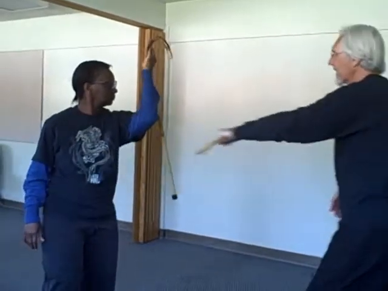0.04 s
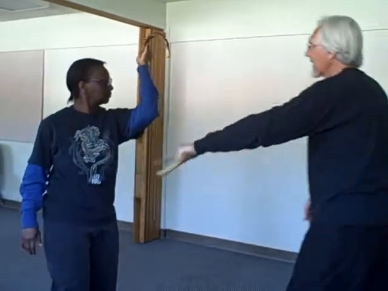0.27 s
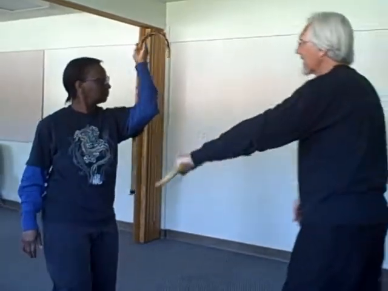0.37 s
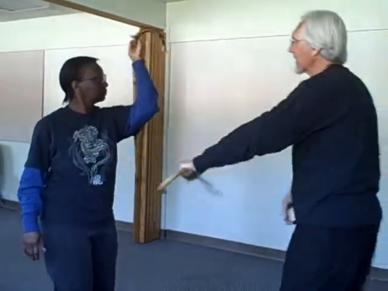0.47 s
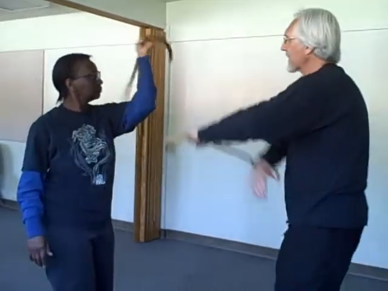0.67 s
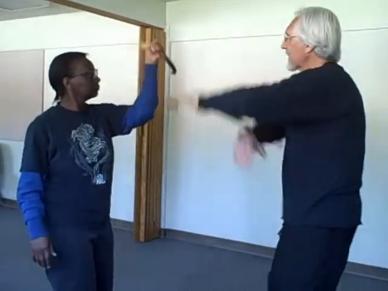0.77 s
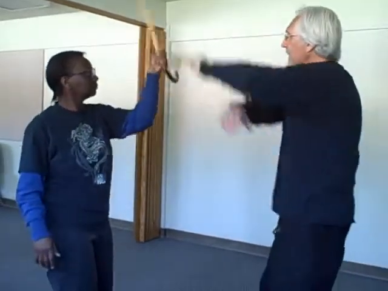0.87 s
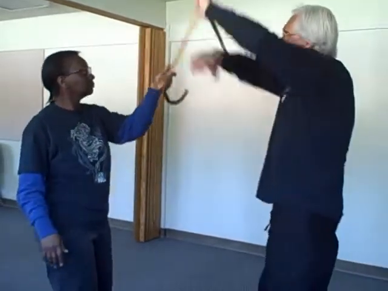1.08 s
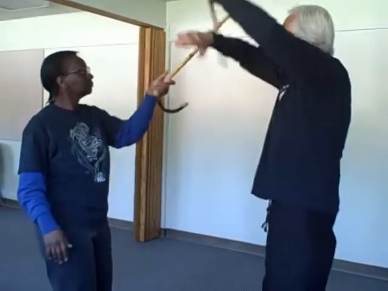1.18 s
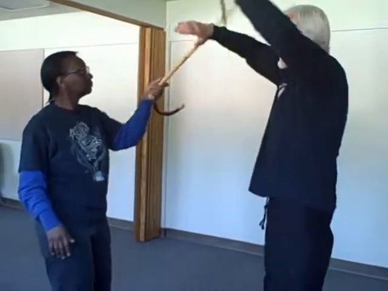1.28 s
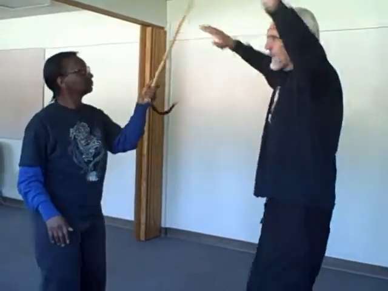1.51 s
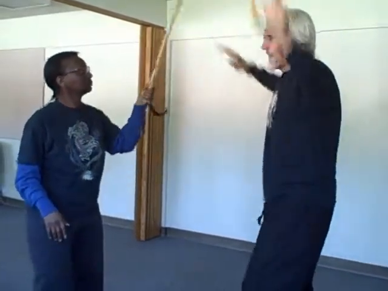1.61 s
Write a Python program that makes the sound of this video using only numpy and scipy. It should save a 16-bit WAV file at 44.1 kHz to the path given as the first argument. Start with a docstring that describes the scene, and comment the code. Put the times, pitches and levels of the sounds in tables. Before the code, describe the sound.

Wooden sticks knock sharply together, one hit and then a quick pair, echoing briefly indoors.

```python
"""Two wooden canes clack together three times in a partner drill, close by in a carpeted hall.
Each blow is a hard crack, and the canes bend and ring briefly at many pitches. Near walls throw
the crack back, and the hall rings on for about half a second. Underneath are the rumble and hum
of ventilation, a swish of sleeves and two soft steps that make the floor boom."""
import sys
import numpy as np
from scipy import signal
from scipy.fft import rfft, irfft
from scipy.io import wavfile
from scipy.ndimage import uniform_filter1d

SR = 44100
rng = np.random.default_rng(int(sys.argv[2]) if len(sys.argv) > 2 else 0)


def dump(signal):
    """Clip the signal to [-1, 1] and save it as 16-bit WAV at the path in sys.argv[1]."""
    limited = np.clip(np.atleast_2d(signal).T, -1, 1)
    pcm = np.round(limited * 32767).astype(np.int16)
    wavfile.write(sys.argv[1], SR, pcm)


N = 72765

# Table levels are relative. A "fade" is the time a sound takes to drop by 60 dB.
# tone colour of the faint hiss (f/Hz, level/dB)
HISS_COLOUR = [(150, 1), (200, -3.5), (316, -4.5), (400, -11), (480, -12), (600, -17.5), (1270, -22),
               (1740, -25), (5000, -33), (12800, -36.5), (16000, -46)]
# tone colour of the ventilation rumble (f/Hz, level/dB)
RUMBLE_COLOUR = [(12, 0), (30, 7), (55, 1), (90, -3), (130, -10.5), (180, -12), (260, -36.5), (500, -51)]
# how the rumble swells and sinks (t/s, level/dB)
RUMBLE_SWELL = [(0, -37), (.12, -41), (.33, -39), (.45, -41.5), (.6, -39), (.71, -35.5), (.78, -41),
                (.87, -37.5), (1.02, -43.5), (1.2, -38.5), (1.4, -39), (1.65, -42)]
# tone colour of rubbing cloth (f/Hz, level/dB)
CLOTH_COLOUR = [(150, -13.5), (400, 3), (1200, -4), (3000, -11.5), (8000, -17.5), (16000, -36.5)]
# sleeve swishes (middle t/s, half length/s, level/dB)
SLEEVE_SWISHES = [(0.65, 0.13, -58.5), (0.894, .08, -79.5)]
# footsteps (t/s, level/dB)
FOOTSTEPS = [(1.353, -27.5), (1.55, -35)]
# deep tones of the floor (f/Hz, fade/s, level/dB)
FLOOR_TONES = [(50, 0.25, -25), (94, 0.427, 1.5), (122.3, 0.336, 0), (158.7, 0.084, 11.5)]
# how the hall rings on at each pitch (f/Hz, fade/s, level/dB)
HALL_BANDS = [(205, 0.42, -3), (466, 0.3, 9), (986, 0.42, -3), (1590, 0.48, -1), (2360, 0.55, 1),
              (3840, 0.49, .5), (5910, 0.54, -4), (10500, .34, -3), (16000, 0.24, 3.5)]
# echoes from walls and ceiling, one list per blow as the canes change place (delay/s, level/dB)
WALL_ECHOES = [
    [(.0013, -1), (.0048, -3), (.0146, -8), (0.027, -12), (.041, -8.5)],
    [(.0013, -4), (.0058, -10), (.0138, 1), (.0418, -7), (.0532, -9.5)],
    [(.0022, -4), (.0055, -6.5), (.0102, -2), (.0135, -5), (.0185, -8)],
]
# tone colour of the crack (f/Hz, level/dB)
CRACK_COLOUR = [(100, -33), (280, -26.5), (450, -18), (800, -13), (1150, -9), (1550, -1.5), (2300, 0.5),
                (3200, -2), (4500, -3), (6000, -5.5), (8500, -9), (12500, -14), (16000, -17)]
# tone colour of the thin tick as the canes touch (f/Hz, level/dB)
TICK_COLOUR = [(1000, -22.5), (4000, -3.5), (7500, -3), (8700, -4.5), (10200, 3), (12000, -5.5),
               (16000, -11)]
# bending tones of the canes; the spot that is hit sets how hard each rings
# (f/Hz, fade/s, level/dB in blow 1, level/dB in blow 2, level/dB in blow 3)
CANE_TONES = [(403, 0.22, -41, -48.5, -51), (543, 0.153, -37, -42.5, -46.5), (741, 0.091, -31, -30.5, -31),
              (998, .105, -21.5, -23, -25.5), (1397, 0.049, -52.5, -19.5, -19.5), (1520, .1, -38, -23, -31),
              (1640, 0.11, -31.5, -27, -29), (1977, 0.036, -13, -21, -53), (2098, 0.076, -27.5, -18, -22),
              (2442, 0.053, -14.5, -27, -32), (2976, 0.037, -38, -17, -18), (3233, 0.046, -19, -25, -35),
              (3277, 0.064, -18.5, -38.5, -18.5), (3745, 0.052, -15, -52, -34),
              (4425, 0.049, -28, -25, -30), (4760, .07, -23.5, -44, -30.5), (5325, 0.13, -27.5, -53, -38),
              (5790, 0.03, -16.5, -56, -19), (6480, 0.035, -47, -22.5, -29), (7380, 0.045, -39, -45, -33)]
# the blows (t/s, crack level/dB, ring level/dB, treble corner f/Hz, tick level/dB, hall level/dB)
CANE_BLOWS = [(0.2202, 0, 1.5, 6270, -5, 1), (1.1832, -2, 0, 6240, -3, 3),
              (1.2896, -1.5, 1.5, 6400, -0.5, 2)]

HISS_DB, HUM_DB, HUM_HZ, HUM_WIDTH_HZ = -52, -51.5, 160.5, 32.4
STEP_RISE_S, ROOM_RISE_S = 0.033, 0.0097
CRACK_GAIN_DB, BODY_GAIN_DB, RING_GAIN_DB = 9, 4.5, 0.5
HALL_GAIN_DB, HALL_RING_GAIN_DB, SCATTER_GAIN_DB, SCATTER_TICK_GAIN_DB = 2, -18, 2, -7
BODY_FADE_S, TICK_FADE_S, SCATTER_FADE_S = 0.027, 0.018, 0.054
ECHO_TOP_HZ, TOP_HZ = 9000, 15800


def undb(db):
    """Turn decibels into a factor to multiply by."""
    return 10 ** (np.asarray(db) / 20)


def unit_energy(x):
    """Scale a sound so that its total energy is 1."""
    return x / np.sqrt(np.sum(x ** 2))


def fade(t, fade_s):
    """Die away by 60 dB every fade_s seconds."""
    return np.exp(-np.log(1000) * t / fade_s)


def tone(t, hz, fade_s, db):
    """One pure tone that dies away."""
    return undb(db) * fade(t, fade_s) * np.sin(2 * np.pi * (hz * t + rng.random()))


def delay(x, s):
    """Start a sound s seconds later."""
    return np.concatenate([np.zeros(max(int(s * SR), 0)), x])[:N]


def through(x, response):
    """Give a sound the ring or echo of another (convolution)."""
    return signal.fftconvolve(x, response)[:N]


def look_up(hz, table, column=1):
    """Read a table at any pitch, gliding between its rows."""
    table = np.array(table)
    return np.interp(np.log(hz + 1), np.log(table[:, 0]), table[:, column])


def noise(gain):
    """Noise of average power 1; gain(hz) sets how strong each frequency is."""
    spectrum = rfft(rng.standard_normal(N)) * gain(np.fft.rfftfreq(N, 1 / SR))
    return np.sqrt(N) * unit_energy(irfft(spectrum, N))


def coloured_noise(colour):
    """Noise with the tone colour given in a table."""
    return noise(lambda hz: undb(look_up(hz, colour)))


def click(colour, corner_hz, size=2048):
    """A click with a given tone colour; a softer contact has a lower treble corner."""
    hz = np.fft.rfftfreq(size, 1 / SR)
    gain = undb(look_up(hz, colour)) / np.hypot(1, (hz / corner_hz) ** 2)
    # pack the energy at the very start, keeping the colour (minimum phase)
    index = np.arange(size)
    fold_forward = 1 + np.sign(size / 2 - index) * (index > 0)
    return irfft(np.exp(rfft(irfft(np.log(gain)) * fold_forward)))


def dense_ring(envelope):
    """Countless tones ringing at once: a burst of noise, evened out so that no pitch stands out."""
    x = rng.standard_normal(N) * envelope
    for _ in range(4):
        spectrum = rfft(x)
        nearby_power = uniform_filter1d(abs(spectrum) ** 2, size=120)
        x = irfft(spectrum / np.sqrt(nearby_power + 1e-18), N)
        x = x * np.minimum(1, envelope * 20)  # keep the burst short
    return unit_energy(x)


def ventilation(t):
    """Ventilation hums and rumbles in slow swells, with a faint hiss."""
    hum = noise(lambda hz: 1 / (1 + (2 * (hz - HUM_HZ) / HUM_WIDTH_HZ) ** 2))
    hiss = noise(lambda hz: undb(look_up(hz, HISS_COLOUR)) * (hz > HISS_COLOUR[0][0]))
    swell = undb(np.interp(t, *np.array(RUMBLE_SWELL).T))
    rumble = coloured_noise(RUMBLE_COLOUR) * swell
    return undb(HISS_DB) * hiss + rumble + undb(HUM_DB) * hum


def sleeves(t):
    """Cloth swishes as the arms swing round."""
    swings = sum(undb(db) * np.exp(-((t - middle) / half) ** 2) for middle, half, db in SLEEVE_SWISHES)
    return coloured_noise(CLOTH_COLOUR) * swings


def steps(t):
    """Soft steps make the carpeted floor boom."""
    boom = sum(tone(t, hz, fade_s, db) for hz, fade_s, db in FLOOR_TONES)
    soft_start = 1 - np.exp(-t / STEP_RISE_S)
    return sum(delay(undb(db) * boom * soft_start, start) for start, db in FOOTSTEPS)


def hall_tail(t):
    """Countless echoes blur into a tail that lasts longest at upper middle pitches."""
    hz = np.fft.rfftfreq(N, 1 / SR)
    spectrum, tail = rfft(rng.standard_normal(N)), 0
    for centre in 125 * 2 ** (np.arange(15) / 2):  # bands half an octave apart
        band_shape = np.maximum(1 - 2 * abs(np.log2((hz + 1) / centre)), 0)
        band = irfft(spectrum * band_shape, N)
        fade_s, db = look_up(centre, HALL_BANDS), look_up(centre, HALL_BANDS, column=2)
        tail = tail + band * fade(t, fade_s) * undb(db)
    return unit_energy(tail * (1 - np.exp(-t / ROOM_RISE_S)))


def reverberation(t, pulse, tick, ring, hall_db):
    """A blow bounces around the room: first a quick scatter of echoes, then the longer tail."""
    scatter_shape = fade(t, SCATTER_FADE_S) * (1 - np.exp(-t / ROOM_RISE_S))
    scatter = undb(SCATTER_GAIN_DB) * dense_ring(scatter_shape)
    tail = undb(HALL_GAIN_DB + hall_db) * hall_tail(t)
    return (through(scatter + tail, pulse)
            + undb(SCATTER_TICK_GAIN_DB) * through(scatter, tick)
            + undb(HALL_RING_GAIN_DB) * through(tail, ring))


def wall_echoes(crack, echoes):
    """Near walls and the ceiling throw back slightly duller copies of the crack."""
    dulled = signal.lfilter(*signal.butter(2, ECHO_TOP_HZ, fs=SR), crack)
    return sum(undb(db) * delay(dulled, lag) for lag, db in echoes)


def canes(t):
    """Wood hits wood with a crack and a tick, the bent canes ring, and the room answers."""
    out = 0
    for blow, (start, crack_db, ring_db, corner_hz, tick_db, hall_db) in enumerate(CANE_BLOWS):
        pulse = undb(CRACK_GAIN_DB + crack_db) * click(CRACK_COLOUR, corner_hz)
        body = undb(BODY_GAIN_DB) * through(dense_ring(fade(t, BODY_FADE_S)), pulse)
        crack = np.pad(pulse, (0, N - len(pulse))) + body
        tick = undb(tick_db) * through(dense_ring(fade(t, TICK_FADE_S)), click(TICK_COLOUR, TOP_HZ))
        bending = sum(tone(t, hz, fade_s, levels[blow]) for hz, fade_s, *levels in CANE_TONES)
        ring = undb(RING_GAIN_DB + ring_db) * bending
        room = wall_echoes(crack, WALL_ECHOES[blow]) + reverberation(t, pulse, tick, ring, hall_db)
        out = out + delay(crack + tick + ring + room, start)
    return out


def scene():
    """Canes, steps and sleeves over the ventilation, in one channel."""
    t = np.arange(N) / SR
    return (canes(t) + steps(t) + sleeves(t) + ventilation(t))[None]


def record(dry):
    """A small camera rounds off the loudest peaks and cuts the highest treble."""
    treble_cut = signal.ellip(10, .2, 90, TOP_HZ, fs=SR, output="sos")
    return signal.sosfilt(treble_cut, np.tanh(dry))


dry = scene()
out = record(dry)
dump(out)
```